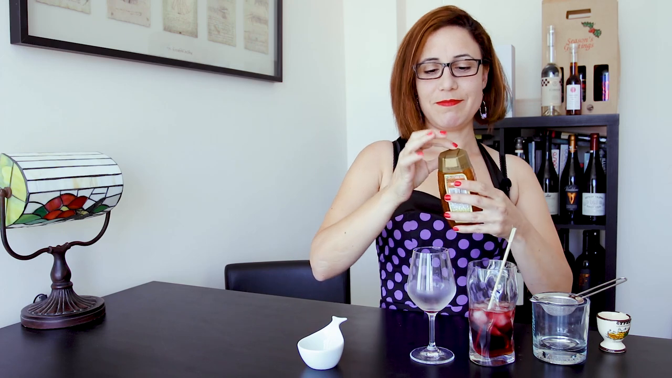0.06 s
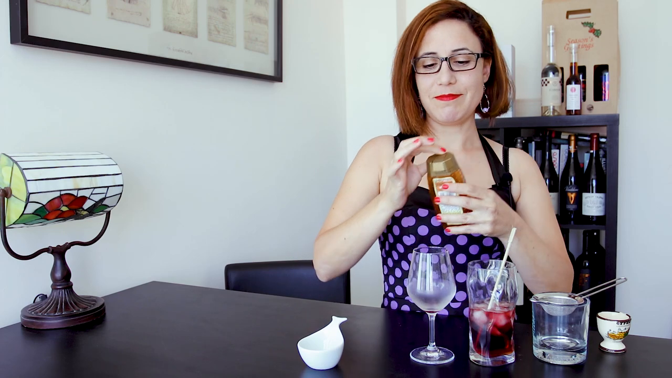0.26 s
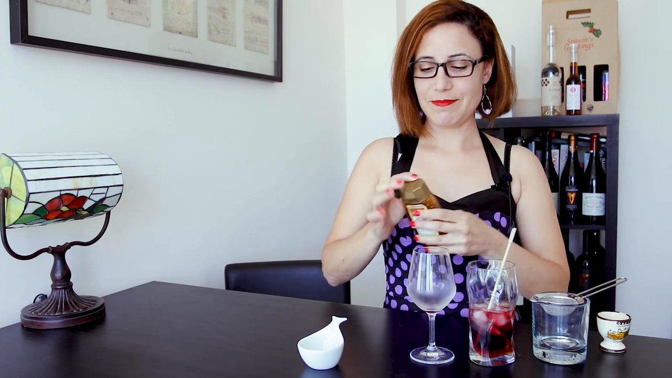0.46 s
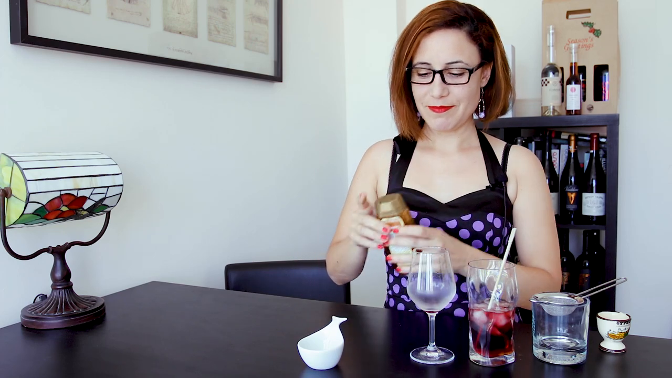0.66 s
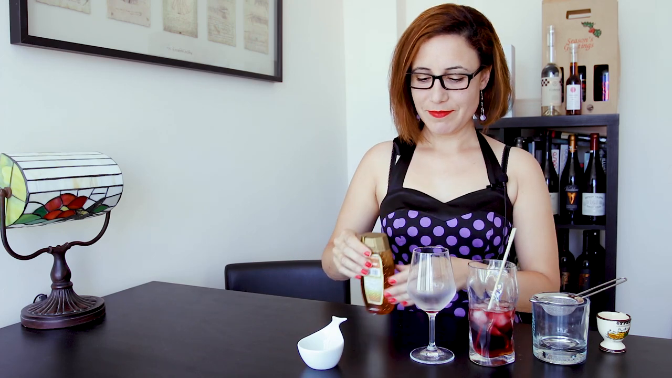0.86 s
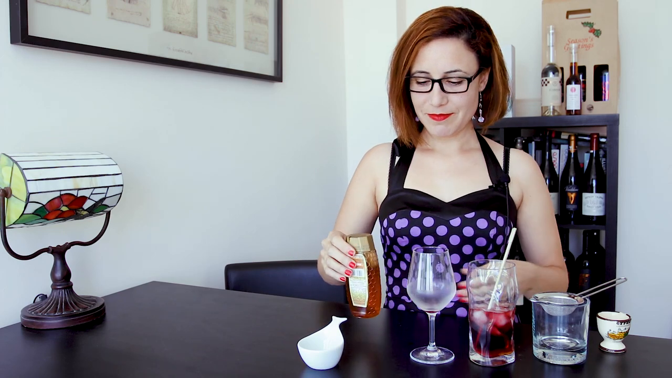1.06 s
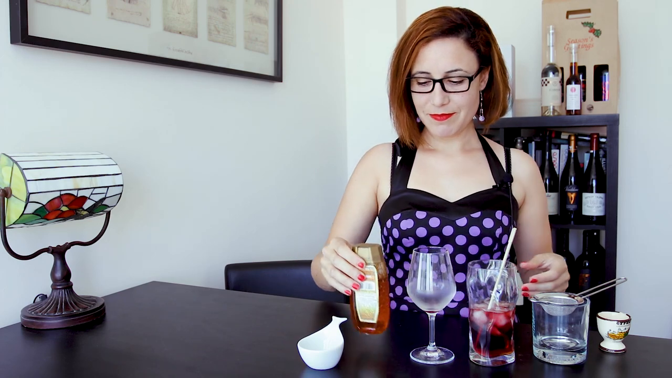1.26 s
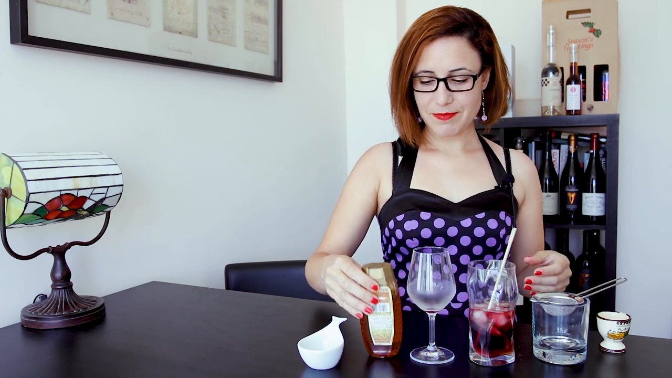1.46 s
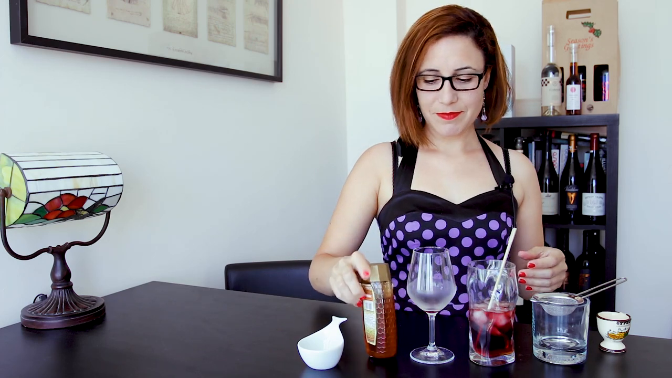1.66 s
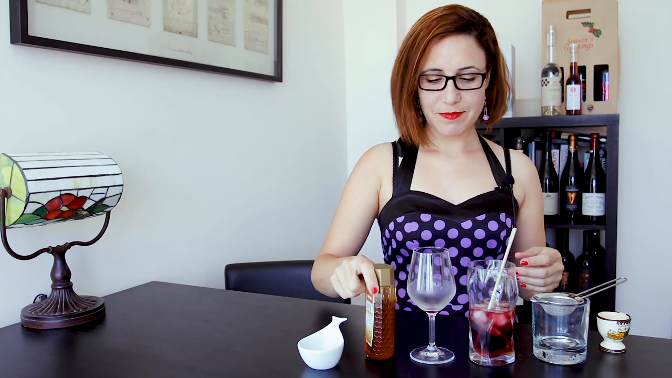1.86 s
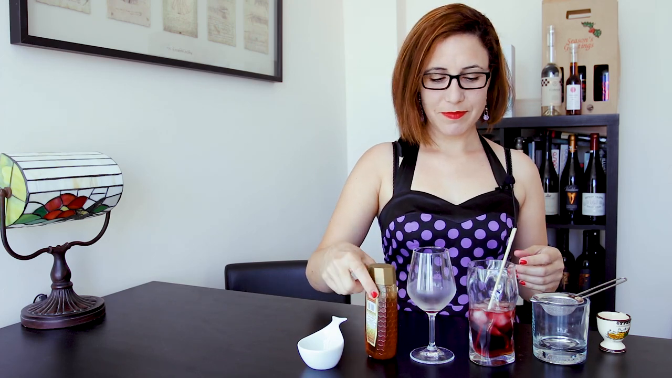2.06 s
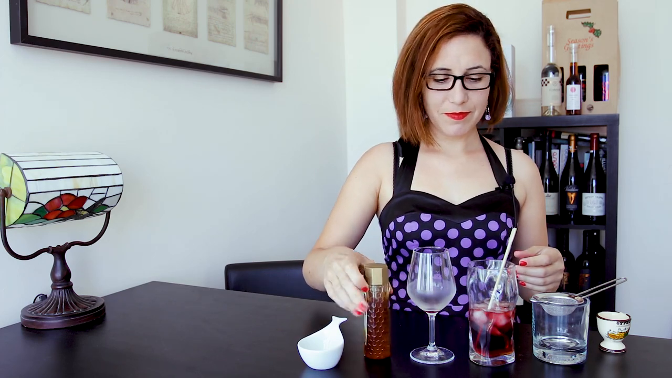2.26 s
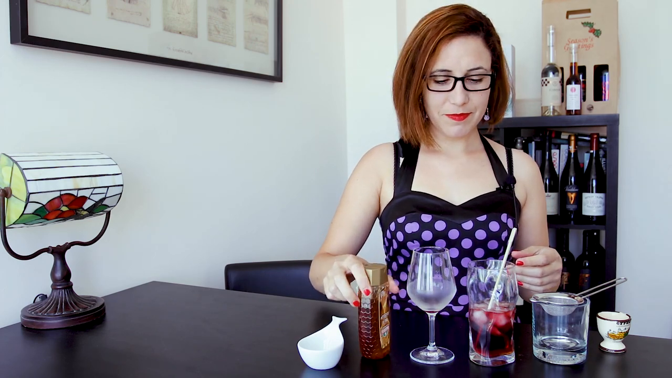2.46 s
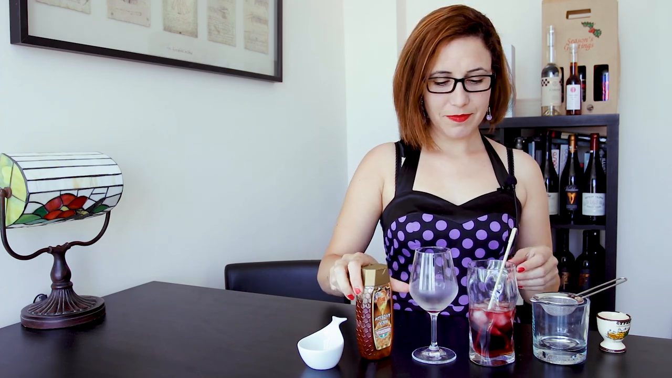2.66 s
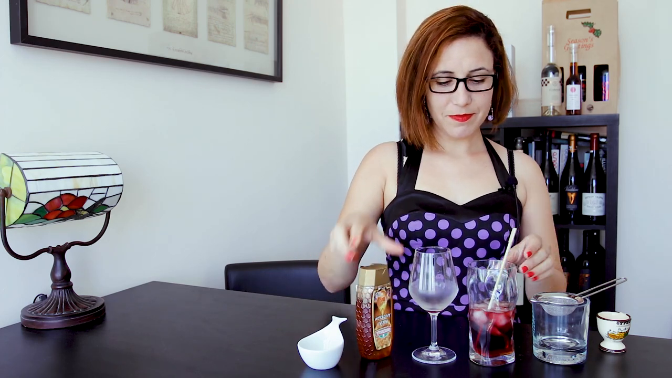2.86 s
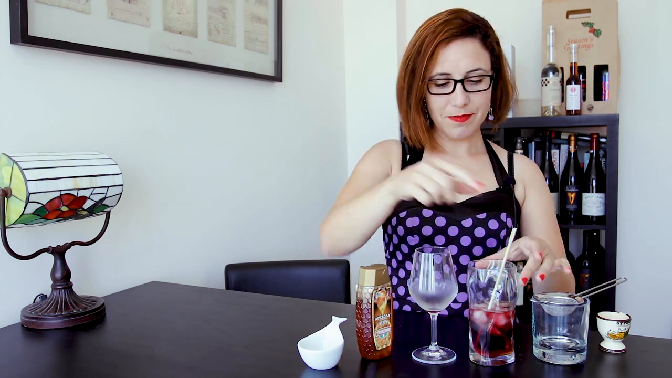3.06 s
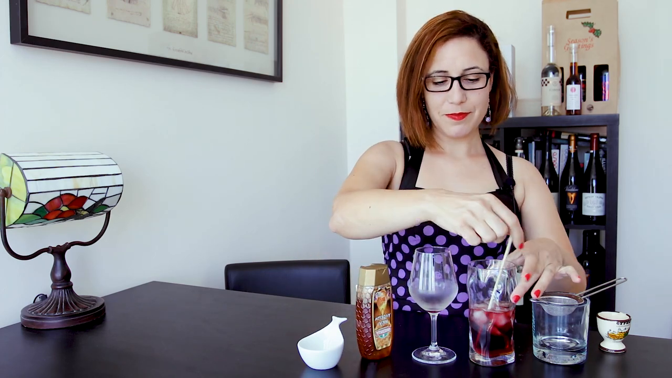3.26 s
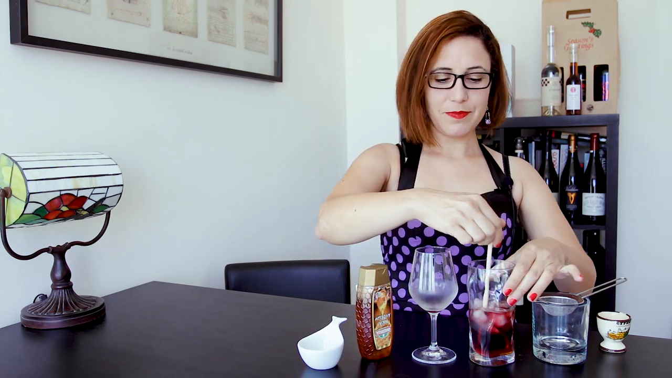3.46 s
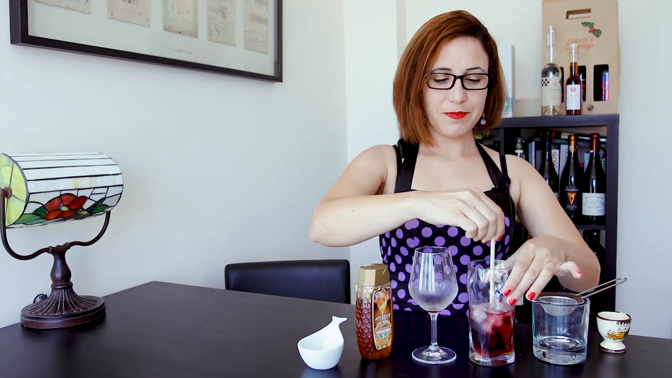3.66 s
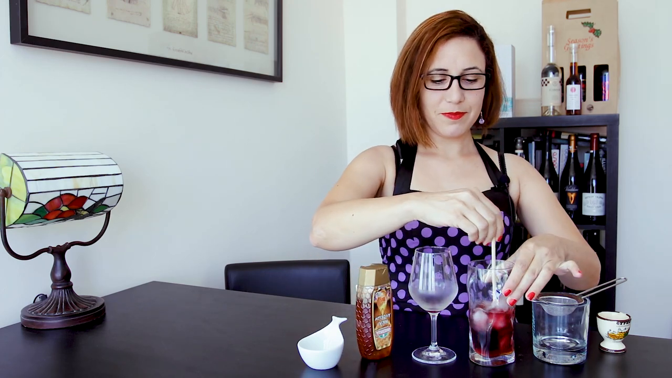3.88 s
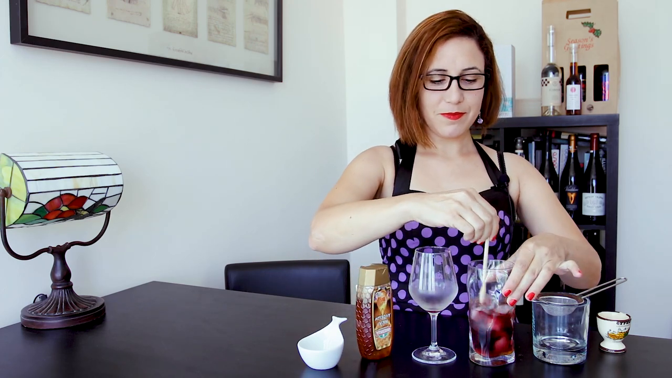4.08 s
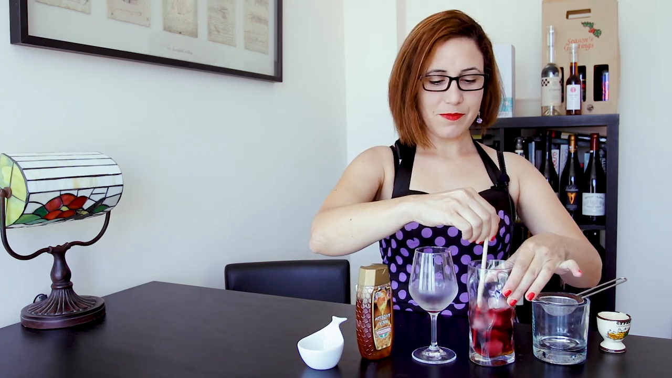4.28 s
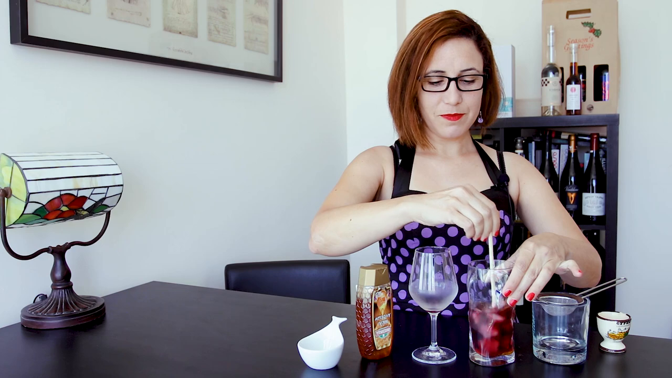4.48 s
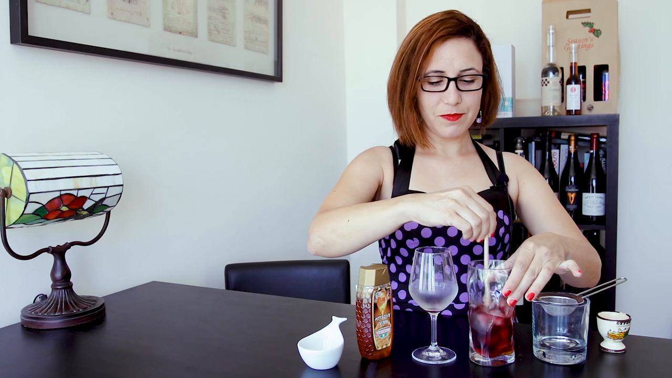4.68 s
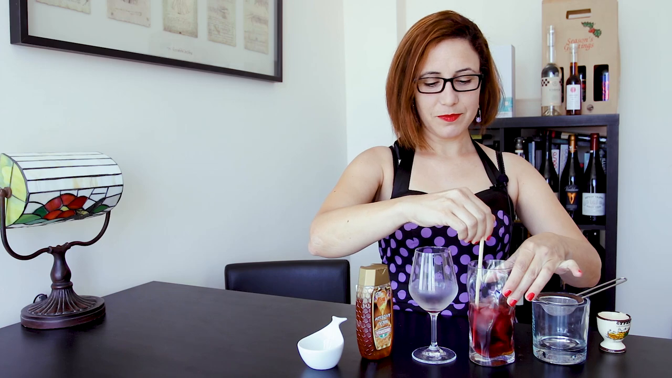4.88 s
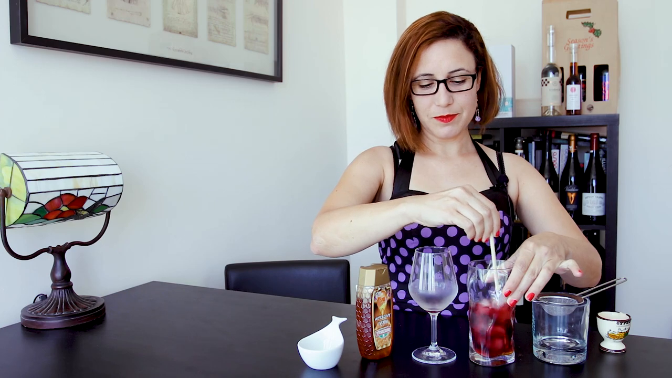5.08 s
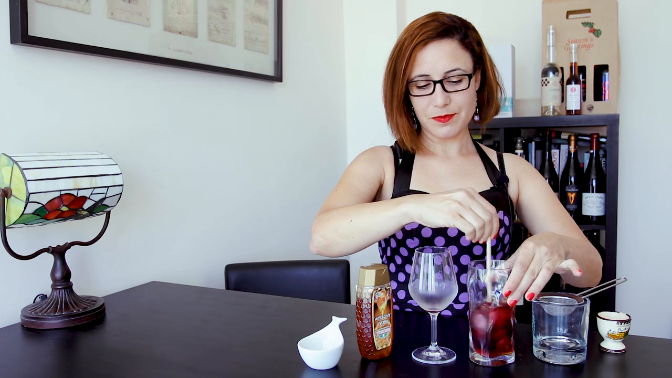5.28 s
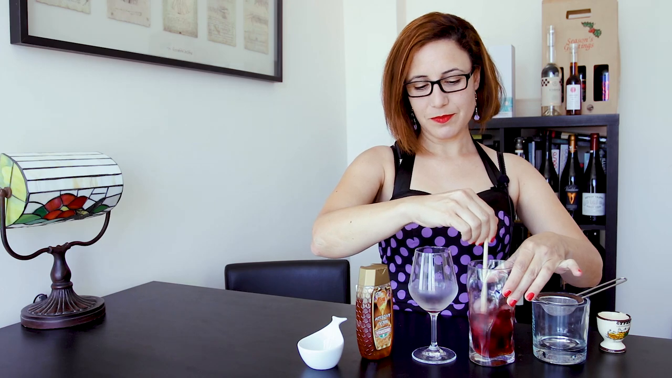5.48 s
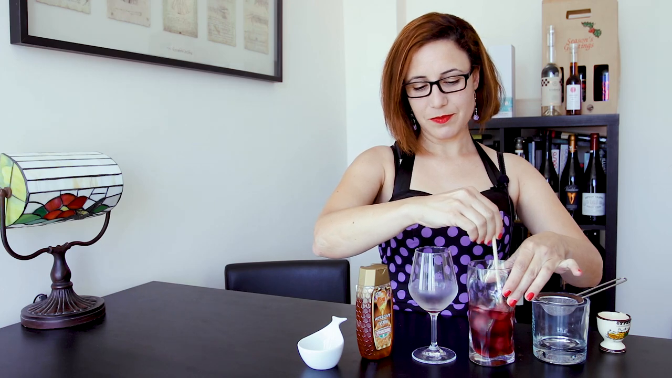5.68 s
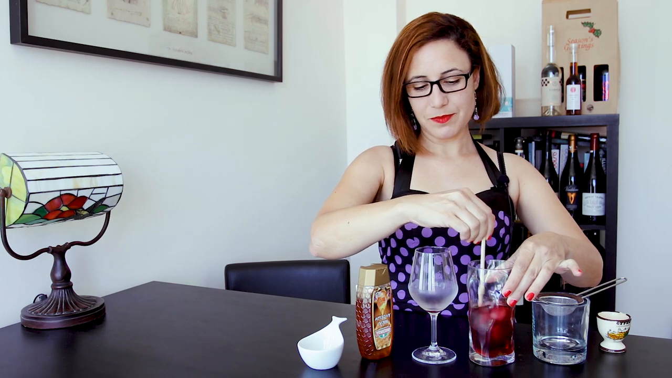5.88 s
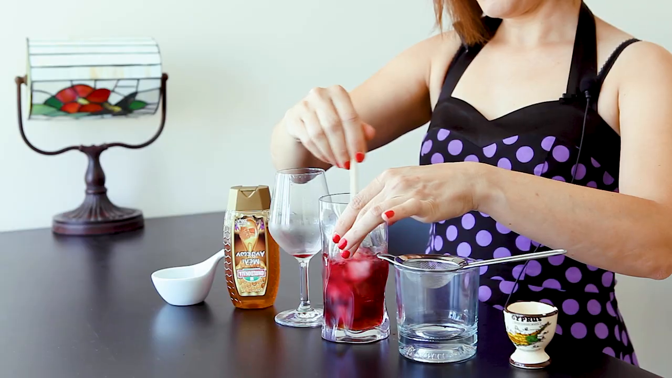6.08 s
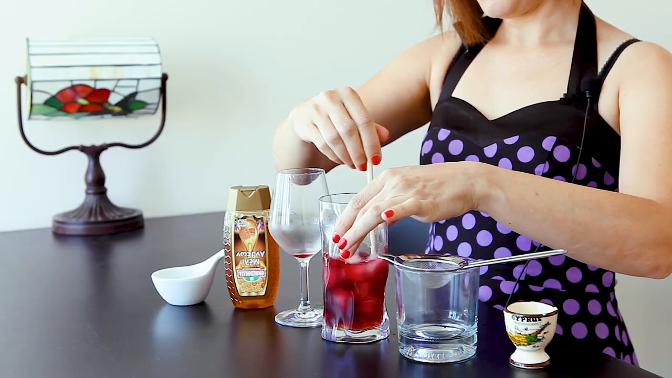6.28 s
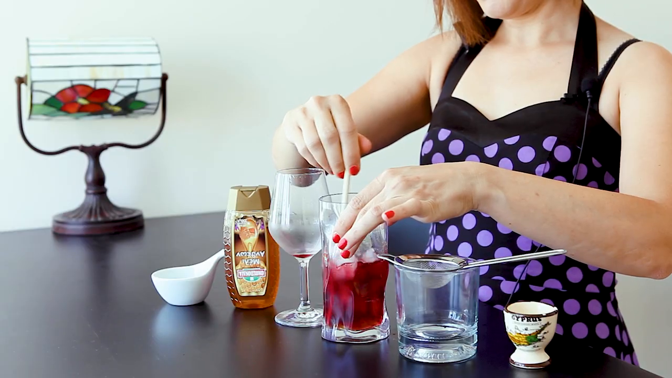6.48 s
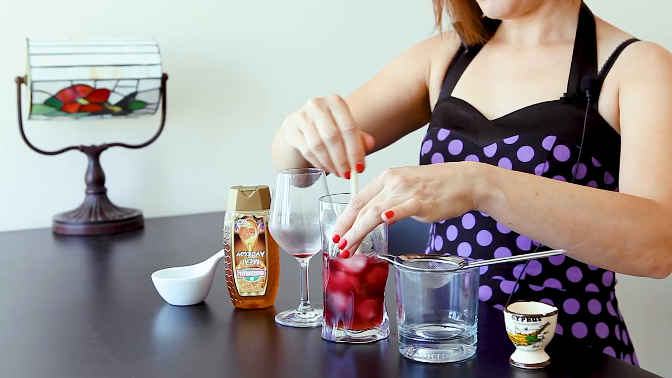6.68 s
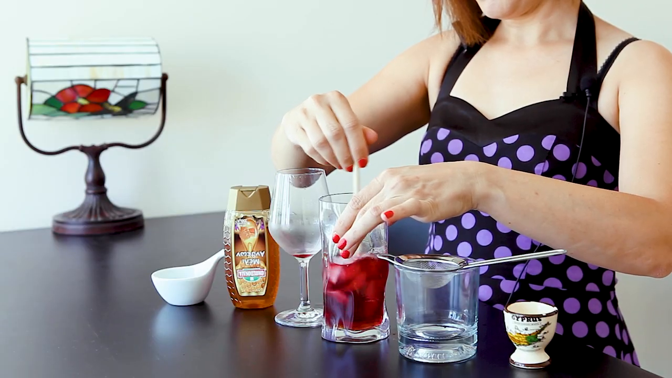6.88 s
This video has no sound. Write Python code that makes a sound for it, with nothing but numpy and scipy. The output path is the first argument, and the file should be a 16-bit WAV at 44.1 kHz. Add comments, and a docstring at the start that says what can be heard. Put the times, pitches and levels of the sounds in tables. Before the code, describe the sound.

Soft cloth rustle, a bottle set down on wood and nudged aside, followed by brisk, continuous clinking of ice stirred in a glass.

```python
"""A drink full of ice is stirred: damped sines for ice, glass wall and rising bubbles, random clicks for rattle.
Before it a plastic bottle snaps shut (short rings, noise crack), is set down on a wooden table (decaying
modes) and pushed aside (squeak of slips on a gliding pitch).
Clothes rustle near the microphone: random snaps and hiss. A bare room answers with decaying noise;
below lie noise for air and rumble, sines for hum and a thin electrical whine."""
import sys
import numpy as np
from scipy import signal
from scipy.fft import rfft, irfft, next_fast_len
from scipy.io import wavfile
from scipy.ndimage import uniform_filter1d

SR = 44100
rng = np.random.default_rng(int(sys.argv[2]) if len(sys.argv) > 2 else 0)


def dump(signal):
    """Clip the signal to [-1, 1] and save it as 16-bit WAV at the path in sys.argv[1]."""
    limited = np.clip(np.atleast_2d(signal).T, -1, 1)
    pcm = np.round(limited * 32767).astype(np.int16)
    wavfile.write(sys.argv[1], SR, pcm)


N = 305613

# Clear knocks of ice. Each row: start in seconds, level in dB, pitch of the piece in Hz,
# share into the glass wall in dB, share of the sharp edge in dB.
ICE_KNOCKS = [(3.456, -35, 4600, -13, -25), (3.5273, -41, 4260, -15, -29), (3.5352, -41, 4970, -3, -9),
              (3.5618, -40, 4160, -7, -24), (3.5945, -36, 4250, -7, -15), (3.6174, -21, 4260, -19, -28),
              (3.6263, -14, 5600, -25, -36), (3.6436, -17, 4400, -12, -35), (3.653, -20, 5630, -12, -32),
              (3.6722, -20.5, 6150, -18, -31), (3.6948, -16.5, 4240, -18, -30),
              (3.717, -22, 4130, -15, -22), (3.7302, -16, 5950, -14, -25), (3.7504, -21, 6040, -10, -30),
              (3.7694, -23, 4080, -10, -30), (3.7824, -14.5, 5570, -12.5, -33),
              (3.803, -21, 4200, -14, -23), (3.8173, -14.5, 4130, -14, -28),
              (3.8395, -11.5, 5400, -23, -31), (3.869, -14.5, 4120, -26, -24), (3.892, -14, 6060, -29, -24),
              (3.916, -12.5, 5500, -10.5, -34), (3.9499, -13, 4230, -21, -26),
              (3.9624, -14.5, 4800, -27, -30), (3.9824, -12, 4230, -11, -30), (4.013, -22.5, 4230, -5, -32),
              (4.0316, -16.5, 5200, -8, -35), (4.047, -18.5, 4130, -8, -20), (4.0647, -16, 4200, -27, -27),
              (4.071, -8, 4130, -25, -33), (4.0924, -23, 4080, -20, -26), (4.1133, -14, 3980, -26, -27),
              (4.125, -11, 4040, -14, -32), (4.178, -22, 5600, -23, -31), (4.1959, -17.5, 5860, -27, -32),
              (4.206, -16.5, 5500, -18, -38), (4.226, -25, 4800, -18, -35), (4.2523, -23, 4660, -8, -28),
              (4.2992, -15.5, 5530, -18, -24), (4.3078, -13.5, 4130, -14, -25),
              (4.343, -11, 4180, -15, -30), (4.362, -20.5, 4660, -1, -26), (4.374, -9, 5370, -13.5, -29),
              (4.4029, -17.5, 5880, -20, -32), (4.4644, -18, 4100, -10, -38), (4.4984, -14, 4840, -21, -28),
              (4.5466, -18.5, 5100, -5, -39), (4.584, -12, 4900, -7.5, -33), (4.6309, -10, 5770, -14, -39),
              (4.6594, -13.5, 4000, -12, -29), (4.7024, -21, 4700, -20, -27), (4.7393, -18, 4200, -26, -29),
              (4.777, -20, 4100, -5, -34), (4.791, -14, 5100, -13, -31), (4.8431, -14.5, 4030, -10, -28),
              (4.8784, -20.5, 4030, -9, -33), (4.9137, -19, 5300, -8, -32), (4.948, -8.5, 4480, -15, -32),
              (5.032, -19.5, 5700, -26, -33), (5.0494, -14, 4570, -31, -33), (5.0813, -15, 4600, -10, -24),
              (5.0986, -17, 4600, -9, -34), (5.1238, -25, 3980, -6, -30), (5.1365, -13, 4700, -13, -23),
              (5.1783, -18, 4300, -12, -30), (5.2043, -21, 4210, -9, -27), (5.243, -10, 4480, -15, -28),
              (5.2774, -16, 5540, -15, -28), (5.3, -18.5, 5330, -29, -30), (5.3445, -20, 4610, -10, -29),
              (5.385, -14, 4150, -9.5, -33), (5.4171, -17.5, 4620, -11, -27),
              (5.436, -15.5, 4080, -11, -28), (5.469, -12, 3900, -14, -34), (5.4829, -17, 4370, -3, -32),
              (5.5028, -16.5, 5150, -4, -30), (5.5345, -20, 4400, -10, -29), (5.541, -17, 4100, -8, -24),
              (5.5582, -10.5, 5960, -6.5, -23), (5.5902, -12.5, 5840, -10, -27),
              (5.6023, -17, 4030, -8, -30), (5.6228, -14.5, 4130, -10, -25), (5.668, -18.5, 4380, -4, -31),
              (5.6846, -24, 4220, -11, -29), (5.719, -15.5, 4250, -10, -26),
              (5.7426, -16.5, 4100, -18, -29), (5.769, -16, 3970, -18, -32), (5.7825, -24, 4020, -4, -29),
              (5.7997, -13, 4800, -7.5, -27), (5.8204, -18, 3950, -10.5, -32),
              (5.8553, -16.5, 4400, -9, -25), (5.8882, -18, 4300, -7, -29), (5.973, -22, 5450, -5, -43),
              (5.9924, -16, 5400, -5, -40), (6.0437, -11, 5700, -18, -17), (6.0753, -18, 4230, -17, -32),
              (6.1056, -14, 4680, -9.5, -34), (6.1539, -20, 4130, -10, -33),
              (6.1674, -13.5, 4550, -10, -27), (6.2015, -13.5, 4950, -19, -33),
              (6.2216, -16, 6000, -8, -28), (6.2846, -21, 4690, -14, -29), (6.325, -17, 4500, -5, -29),
              (6.348, -14.5, 4230, -11, -30), (6.3754, -23, 4400, -19, -40),
              (6.3954, -13, 4600, -15.5, -20), (6.4288, -19.5, 4590, -2, -22), (6.4635, -19, 5130, -9, -20),
              (6.4755, -16, 5970, -14, -29), (6.4897, -18, 5900, -12, -25), (6.5073, -22, 4800, -23, -31),
              (6.5495, -9.5, 6060, -33, -28), (6.63, -15, 5600, -24, -37), (6.6518, -16, 4730, -14, -35),
              (6.6877, -16, 4750, -15, -33), (6.7147, -20.5, 4230, -14, -32),
              (6.7283, -17.5, 4610, -9.5, -31), (6.762, -20, 5340, -11, -32),
              (6.798, -22.5, 4330, -4.5, -27), (6.8079, -13.5, 5430, -19, -35),
              (6.8402, -19, 5770, -7, -24), (6.8529, -17, 4600, -8, -39), (6.8826, -19, 4160, -12, -23),
              (6.8935, -15.5, 4390, -7.5, -30), (6.9164, -16, 4350, -12, -32)]
# Stirring curve. Each row: time in seconds, small rattle in dB, push of the glass on the table in dB,
# small bubbles in dB.
STIRRING = [(3.61, -46.5, -54, -55), (3.82, -34.5, -44.5, -49), (3.9, -39, -52, -57),
            (3.92, -40, -42.5, -50), (4.22, -35.5, -48, -50), (4.27, -35, -51, -52),
            (4.38, -36.5, -44, -45), (4.45, -34.5, -51.5, -55.5), (4.64, -34, -46.5, -49),
            (4.81, -31.5, -49.5, -46.5), (5.09, -32, -49, -49), (5.22, -27.5, -39, -42),
            (5.38, -33.5, -48, -50.5), (5.53, -31, -45.5, -46), (5.55, -29.5, -38, -35),
            (5.68, -32, -44, -53), (5.78, -39, -57, -45.5), (5.81, -34, -48, -46.5), (5.99, -30, -51, -50),
            (6.07, -29, -43, -43), (6.32, -31.5, -50, -44), (6.5, -27.5, -42, -38), (6.68, -34, -50.5, -43),
            (6.93, -37.5, -53, -49)]
# Modes of the filled glass, damped by drink and hand. Each row: centre pitch in Hz, level in dB, t60 in seconds.
GLASS_MODES = [(1593, -13.5, 0.08), (1950, -10, 0.02), (2183, -15.5, 0.037), (3120, -11, 0.16),
               (3206, -21.5, 0.013), (3311, -4.5, 0.081), (3377, -1, 0.028), (4040, -8.5, 0.042),
               (4170, -1, 0.0089), (4400, -3, 0.023), (4712, -4.5, 0.024), (5307, -5, 0.019),
               (5600, -7, 0.023), (5790, -1.5, 0.019), (6126, 0.5, 0.0056)]
GLASS_WANDER = 0.013   # moving ice and drink shift the glass modes by about this share


def amp(db):
    """Gain of a level in dB."""
    return 10 ** (np.asarray(db) / 20)


def rms_one(x):
    """Scale to rms 1."""
    return x / np.sqrt(np.mean(x ** 2) + 1e-20)


def in_time(rows):
    """Columns of a curve, one value a sample."""
    s, *columns = np.transpose(rows)
    return [np.interp(np.arange(N) / SR, s, c) for c in columns]


def while_on(rows):
    """1 between the first and last row of a curve, with soft ends."""
    t = np.arange(N) / SR
    gate = 1. * (t >= rows[0][0]) * (t <= rows[-1][0])
    return uniform_filter1d(gate, size=800, mode="nearest")


def swell(*times_s):
    """Smooth rise, hold and fall between four times, peak 1."""
    ramp = np.interp(np.arange(N) / SR, np.sort(times_s), [0, 1, 1, 0])
    return np.sin(np.pi / 2 * ramp) ** 2


def butter(x, hz, kind, order=2):
    """Butterworth filter."""
    return signal.sosfilt(signal.butter(order, hz, kind, fs=SR, output="sos"), x)


def coloured(x, spectrum):
    """Give a steady signal the listed spectrum; rms 1."""
    size = next_fast_len(N)
    hz = np.arange(size // 2 + 1) * SR / size + 1   # +1 keeps the logarithm finite
    at_hz, db = np.transpose(spectrum)
    gain = amp(np.interp(np.log(hz), np.log(at_hz), db))
    return rms_one(irfft(rfft(x, size) * gain, size)[:N])


def add(out, s, sound):
    """Mix a short sound in at time s."""
    i = round(s * SR)
    out[i:i + len(sound)] += sound[:N - i]


def ping(hz, t60_s, rise_oct_per_s=0., attack_s=0.0001):
    """A dying sine whose pitch climbs at the given rate."""
    t60_s = max(t60_s, .002)
    t = np.arange(int(t60_s * SR)) / SR
    phase = 2 * np.pi * np.cumsum(hz * 2 ** (rise_oct_per_s * t)) / SR
    return (1 - np.exp(-t / attack_s)) * amp(-60 * t / t60_s) * np.sin(phase)


def ring(clicks, hz, t60_s):
    """Two-pole resonator: a unit click sets a decaying sine ringing."""
    r = amp(-60 / (max(t60_s, .001) * SR))
    w = 2 * np.pi * hz / SR
    return signal.lfilter([0, np.sin(w)], [1, -2 * r * np.cos(w), r * r], clicks + 1e-18)


def grains(per_s, spread_db):
    """Random clicks of uneven size and sign."""
    sizes = amp(spread_db * np.minimum(rng.exponential(1, N), 5)) * rng.choice([-1, 1], N)
    return sizes * (rng.random(N) < per_s / SR)


def dealt_rings(per_s, spread_db, modes):
    """Random clicks, each dealt to one resonator of the list (Hz, dB, t60 s); rms 1."""
    clicks = grains(per_s, spread_db)
    dealt = rng.integers(0, len(modes), N)
    return rms_one(sum(amp(db) * ring(clicks * (dealt == k), hz, t60_s)
                       for k, (hz, db, t60_s) in enumerate(modes)))


def sines(t, rows, waver_db=0.):
    """Sum of steady tones (Hz, rms dB), their level shifted by waver_db."""
    return sum(amp(db + waver_db) * np.sqrt(2) * np.sin(2 * np.pi * hz * t) for hz, db in rows)


def background():
    """Coloured hiss of air and preamp, wavering hum, low rumble, a whine that stops as the stirring starts."""
    # Each row: frequency in Hz, density in dB per Hz (relative).
    air_spectrum = [(40, 0.5), (64, -16), (112, -15.5), (147, -13), (320, -18.5), (700, -23), (1630, -31),
                    (5700, -39), (7500, -42.5), (11000, -42), (16000, -42)]
    # Hum. Each row: frequency in Hz, mean level in dB.
    hum_tones = [(100, -55.5), (140, -69), (200, -72.5)]
    # Whine. Each row: frequency in Hz, level in dB.
    whine_tones = [(9814, -91), (9873, -74)]
    # One swell of the rumble: start, full, fading and end in seconds, level in dB.
    rumble_swell = (1.99, 2.04, 2.24, 2.34, -38)
    air_db, rumble_db, rumble_waver_db, hum_waver_db = -53, -45.5, 1.5, 1.3
    whine_ends_s = 3.62
    t = np.arange(N) / SR
    air = amp(air_db) * coloured(rng.standard_normal(N), air_spectrum)
    waver, drift = (rms_one(butter(rng.standard_normal(N), [.5, 5], "band", order=1)) for _ in range(2))
    hum = sines(t, hum_tones, hum_waver_db * waver)
    level = amp(rumble_db + rumble_waver_db * drift)
    surge = amp(rumble_swell[4]) * swell(*rumble_swell[:4])
    low = rng.standard_normal(N)
    rumble = level * rms_one(butter(low, [7, 24], "band"))
    rumble = rumble + surge * rms_one(butter(low, [12, 36], "band"))
    whine = sines(t, whine_tones) * while_on([[0], [whine_ends_s]])
    return air + hum + rumble + whine


def rustle():
    """Fibres slip in dense tiny snaps over a soft hiss, swelling with each movement."""
    # Each row: frequency in Hz, density in dB per Hz (relative).
    cloth_spectrum = [(88, -16), (150, 7), (368, -11), (1030, -19.5), (1820, -17.5), (3260, -20),
                      (5930, -14.5), (8000, -25.5), (10400, -67), (17600, -120)]
    # Movements of cloth and hands. Each row: start, full, fading and end in seconds, level in dB,
    # added treble of cloth close by in dB.
    movements = [(-.1, 0, .03, .55, -59, -14), (.55, .61, .625, .65, -58, -16),
                 (.62, .9, 1.05, 1.15, -62, -14), (.95, 1.12, 1.13, 1.2, -52, -8),
                 (1.07, 1.11, 1.26, 1.36, -49, -8), (1.62, 1.73, 1.8, 2.0, -59, -14),
                 (1.95, 1.98, 2.0, 2.16, -57, -15), (2.31, 2.345, 2.38, 2.42, -62, -4),
                 (2.612, 2.625, 2.65, 2.85, -56, -11), (2.75, 3.05, 3.15, 3.42, -57, -10),
                 (3.25, 3.45, 3.57, 3.62, -62, -7)]
    fibres = rms_one(grains(1500, 2.0)) + 0.58 * rng.standard_normal(N)
    body = coloured(fibres, cloth_spectrum)
    bright = rms_one(butter(fibres, 7700, "high", order=3))
    return sum(amp(db) * swell(*times_s) * (body + amp(treble_db) * bright)
               for *times_s, db, treble_db in movements)


def dry_clicks(rows, noise_share, noise_t60_s):
    """Each row (s, dB, Hz, t60 s) is a short ring plus a decaying broad crack."""
    out = np.zeros(N)
    for s, db, hz, t60_s in rows:
        tone = ping(hz, t60_s)
        t = np.arange(len(tone)) / SR
        crack = rng.standard_normal(len(tone)) * amp(-60 * t / noise_t60_s)
        add(out, s, amp(db) * (tone + noise_share * crack))
    return out


def cap():
    """A dry snap of plastic close to the microphone: short rings and a broad crack."""
    # Each row: start in seconds, level in dB, pitch in Hz, t60 in seconds.
    cap_snaps = [(0.2254, -34.5, 1240, .008), (0.2274, -37.5, 1710, 0.012), (0.2286, -33, 3080, 0.0054)]
    return dry_clicks(cap_snaps, noise_share=0.34, noise_t60_s=0.0038)


def bottle():
    """Dry clicks of bottle and fingers; the sliding foot squeaks: uneven slips on a gliding pitch."""
    # Each row: start in seconds, level in dB, pitch in Hz, t60 in seconds.
    small_clicks = [(.745, -56, 5000, .01), (1.569, -38, 2280, 0.033), (1.569, -45, 4950, .008),
                    (1.62, -50, 4120, .04), (1.99, -53, 2400, .02), (2.03, -59, 2800, 0.065),
                    (2.099, -49, 6000, .005), (2.18, -56, 5460, 0.0059), (1.575, -67, 6500, 0.39),
                    (2.62, -51, 1700, 0.04), (2.622, -59, 5450, .03), (2.691, -66, 5990, 0.37),
                    (3.041, -42, 5600, 0.0075), (3.285, -51, 5040, 0.0063), (3.381, -55, 5630, 0.022)]
    # Each row: time in seconds, pitch in Hz, level in dB.
    squeak_curve = [(2.42, 2750, -74), (2.486, 2750, -56), (2.56, 2610, -71), (2.62, 2590, -81)]
    clicks = dry_clicks(small_clicks, noise_share=.5, noise_t60_s=0.024)
    hz, db = in_time(squeak_curve)
    slips = rms_one(butter(grains(310, 1.9), 170, "low"))
    carrier = np.sqrt(2) * np.sin(2 * np.pi * np.cumsum(hz) / SR)
    return clicks + amp(db) * while_on(squeak_curve) * slips * carrier


def table(push_db):
    """Set-down blows and the steady jostle of the stirred glass ring shared modes of the table top."""
    # Each row: frequency in Hz, level in dB under a blow, t60 in seconds of a blow, level in dB under the glass.
    top_modes = [(81.5, -2.5, 0.72, -20), (128.7, 5, 0.19, -2), (157.7, 0.5, 0.62, -7),
                 (199, -7, 0.56, -2.5), (248, -3, 0.25, -6.5), (291.4, -7.5, 0.28, -2.5),
                 (410, -10, 0.19, -1.5), (448, -7, 0.071, 8), (680, -14, 0.08, -20), (840, -13, 0.055, -20)]
    # Dense upper modes in octave bands. Each row: centre in Hz, level in dB, t60 in seconds.
    upper_bands = [(337, -19, 0.49), (630, -4, 0.37), (1400, -14.5, 0.22), (2800, -27.5, 0.31),
                   (5600, -57, .2)]
    # Things set on the table. Each row: start in seconds, level in dB, brightness in dB per octave,
    # rattle of upper modes in dB, its brightness in dB per octave.
    blows = [(1.57, -24, 0, -8, 5), (2.389, -49.5, -11.5, -16, 0), (2.558, -46, 1, -13, 9.5),
             (2.685, -47.5, 7, 3, -10), (2.713, -36.5, 9.5, 0, -3.5), (6.49, -42, -12, -15, 0),
             (6.752, -50.5, -18, -12, -9)]
    out, t = np.zeros(N), np.arange(SR) / SR
    for s, db, bright_db, tail_db, tail_bright_db in blows:
        modes = sum(amp(level_db + bright_db * np.log2(hz / 160) - 60 * t / t60_s) * np.sin(2 * np.pi * hz * t)
                    for hz, level_db, t60_s, _ in top_modes)
        noise = rng.standard_normal((len(upper_bands), SR))
        tail = 0
        for own, (hz, level_db, t60_s) in zip(noise, upper_bands):
            band = rms_one(butter(own, [hz / np.sqrt(2), hz * np.sqrt(2)], "band"))
            tail = tail + amp(level_db + tail_bright_db * np.log2(hz / 700) - 60 * t / t60_s) * band
        attack = 1 - np.exp(-t / 0.0032)
        add(out, s, amp(db) * (modes + amp(tail_db) * tail) * attack)
    # under the glass the modes die faster
    glass_modes = [(hz, glass_db, 0.67 * t60_s) for hz, _, t60_s, glass_db in top_modes[1:8]]
    jostle = dealt_rings(1200, 2.5, glass_modes)
    return out + amp(push_db) * jostle * while_on(STIRRING)


def knocks():
    """Each knock rings the piece of ice briefly, strikes the glass modes unevenly and cracks."""
    uneven_db = 3   # spread of a knock's strength over the modes
    out, t = np.zeros(N), np.arange(SR // 10) / SR
    mode_hz, mode_db, t60_s = np.transpose(GLASS_MODES)[:, :, None]
    luck = rng.normal(0, 1, (len(ICE_KNOCKS), len(GLASS_MODES), 2))   # strength, detuning
    crack = rng.standard_normal((len(ICE_KNOCKS), 400))
    body = butter(crack, [2500, 7000], "band") * amp(-60 * t[:400] / 0.009)
    edge = butter(crack, [7500, 15500], "band") * amp(-60 * t[:400] / .006)
    attack = 1 - np.exp(-t / 0.00094)
    for k, (s, db, hz, wall_db, edge_db) in enumerate(ICE_KNOCKS):
        strength = amp(mode_db + uneven_db * luck[k, :, :1] - 60 * t / t60_s) * attack
        shifted_hz = mode_hz * (1 + GLASS_WANDER * luck[k, :, 1:])
        wall = np.sum(strength * np.sin(2 * np.pi * shifted_hz * t), axis=0)
        add(out, s, amp(db + wall_db) * wall)
        add(out, s, amp(db - 7.5) * ping(hz, 0.018))
        add(out, s, amp(db - 3.0) * body[k] + amp(db + edge_db) * edge[k])
    return out


def shaken_up():
    """Liveliness of the loose ice: a steady share plus a surge after every knock; rms 1 while stirring."""
    surge_t60_s, steady_share = 0.21, 1   # share relative to the mean surge
    jolts, r = np.zeros(N), amp(-60 / (surge_t60_s * SR))
    rows = np.array(ICE_KNOCKS)
    jolts[(rows[:, 0] * SR).astype(int)] = amp(rows[:, 1])
    surge = signal.lfilter([1], [1, -r], jolts)
    stirring = slice(int(STIRRING[0][0] * SR), N)
    lively = steady_share + surge / surge[stirring].mean()
    return lively / np.sqrt(np.mean(lively[stirring] ** 2))


def rattle(level_db):
    """Many small touches: some ring the glass, others ring ice pieces of scattered pitch or only tick."""
    # Highest rings of ice and glass. Each row: pitch in Hz, level in dB, t60 in seconds before halving.
    high_rings = [(7400, 7, 0.0073), (8750, -4, 0.0082), (9220, 5, 0.016), (10360, 4.5, 0.011),
                  (11100, 4, 0.0046), (12600, 6, 0.0054), (13400, -6, .004), (14600, -25, 0.0026)]
    wall_modes = [(hz * (1 + GLASS_WANDER * side), db, t60_s)
                  for hz, db, t60_s in GLASS_MODES for side in (-1, 1)]
    wall = dealt_rings(2500, 3.8, wall_modes)
    ice = dealt_rings(1600, 4.5, [(hz, 0, 16.0 / hz) for hz in np.geomspace(2100, 7000, 12)])
    ticks = dealt_rings(1800, 3.0, [(hz, db, .5 * t60_s) for hz, db, t60_s in high_rings])
    touches = grains(320, 4.7)
    sharp = rms_one(butter(touches, [2900, 6800], "band"))
    sharp = sharp + amp(-6) * rms_one(butter(touches, 6600, "high"))
    mix = wall + amp(-9.5) * ice + amp(-15) * ticks + amp(-7) * sharp
    return amp(level_db) * shaken_up() * mix * while_on(STIRRING)


def bubbles(small_db):
    """A bubble rings with rising pitch as it nears the surface; smaller ones burble at random."""
    # Air bubbles. Each row: start in seconds, level in dB, starting pitch in Hz, t60 in seconds.
    air_bubbles = [(4.373, -23.5, 1305, 0.025), (4.679, -23.5, 980, 0.049), (4.717, -27, 1050, 0.073),
                   (4.777, -33, 1255, 0.063), (4.825, -17.5, 1225, 0.032), (4.835, -26.5, 1353, 0.064),
                   (4.903, -23.5, 1240, 0.028), (4.929, -19.5, 979, 0.081), (4.942, -20.5, 1062, 0.059),
                   (5.559, -7.5, 1950, 0.023), (5.592, -13.5, 851, 0.068), (5.602, -9, 890, 0.031),
                   (5.64, -10, 945, 0.06), (5.661, -16, 930, 0.05), (5.681, -14, 988, 0.034),
                   (5.715, -12, 1176, 0.015), (5.749, -26.5, 938, 0.15), (5.799, -26.5, 1518, 0.078),
                   (5.824, -24, 1480, 0.03), (6.154, -30.5, 1570, .08), (6.176, -26.5, 1592, 0.18),
                   (6.201, -18, 1450, 0.04), (6.215, -24, 1320, 0.057), (6.233, -17, 944, 0.05),
                   (6.235, -28, 717, 0.073), (6.249, -17.5, 925, 0.034), (6.289, -30.5, 1217, 0.13),
                   (6.326, -27, 1155, 0.13), (6.344, -29, 900, .06), (6.385, -17, 840, 0.042),
                   (6.412, -23.5, 895, 0.083), (6.429, -19, 1000, 0.035), (6.49, -14.5, 926, 0.036),
                   (6.495, -18.5, 1550, 0.038), (6.509, -12.5, 837, .035), (6.513, -21.5, 1985, .055),
                   (6.55, -24, 740, 0.1), (6.551, -20, 1400, 0.036), (6.569, -20.5, 746, 0.082),
                   (6.591, -11.5, 865, 0.023), (6.622, -21.5, 1950, 0.029), (6.624, -25, 906, .043),
                   (6.65, -23, 824, .05), (6.679, -30, 1586, 0.13), (6.731, -28, 1070, .037)]
    out = np.zeros(N)
    for s, db, hz, t60_s in air_bubbles:
        add(out, s, amp(db) * ping(hz, t60_s, rise_oct_per_s=3.4, attack_s=0.001))
    small = dealt_rings(700, 2.2, [(hz, 0, 30.0 / hz) for hz in np.geomspace(650, 1700, 14)])
    return out + amp(small_db) * small * while_on(STIRRING)


def room(x):
    """A dense tail of echoes after a short gap; the highest band dies first."""
    # Two-octave bands. Each row: centre in Hz, t60 in seconds.
    room_bands = [(600, 0.42), (2400, 0.47), (9600, 0.17)]
    first_echo_s = 0.0057
    t = np.arange(SR // 2) / SR
    noise = rng.standard_normal((len(room_bands), SR // 2))
    tail = sum(butter(own, [hz / 2, hz * 2], "band") * amp(-60 * t / t60_s)
               for own, (hz, t60_s) in zip(noise, room_bands))
    tail = tail * np.clip(t / first_echo_s - 1, 0, 1)   # silent gap, then a fade-in as long
    return signal.fftconvolve(x, tail / np.sqrt(np.sum(tail ** 2)))[:N]


def scene():
    """Table-top sources reach the microphone dulled and with the room; cap, cloth and background lie close."""
    room_db, shelf_hz, shelf_db = -10.5, 6500, -9
    rattle_db, push_db, small_db = in_time(STIRRING)
    top = knocks() + rattle(rattle_db) + bubbles(small_db) + table(push_db) + bottle()
    top = top + amp(room_db) * room(top)
    # distant sounds lose their treble
    treble = butter(top, shelf_hz, "high", order=2)
    top = butter(top, shelf_hz, "low", order=6) + amp(shelf_db) * treble
    return (top + cap() + rustle() + background())[None]


def record(dry):
    """A steep elliptic low-pass cuts the top."""
    cutoff_hz, ripple_db, stop_db = 15750, .5, 85
    return signal.sosfilt(signal.ellip(16, ripple_db, stop_db, cutoff_hz, fs=SR, output="sos"), dry)


dry = scene()
out = record(dry)
dump(out)
```